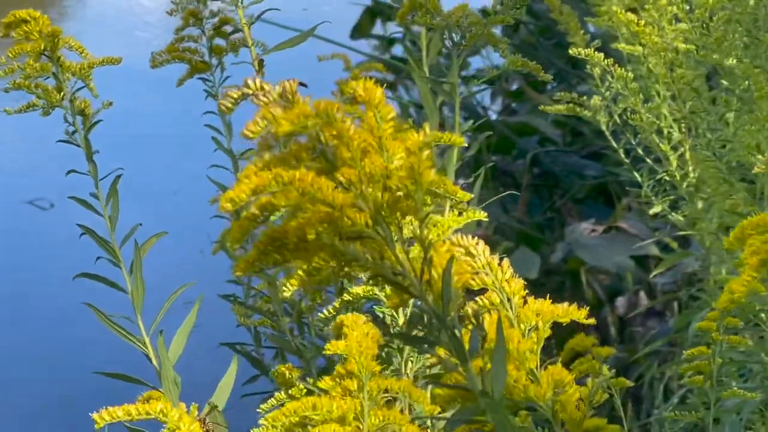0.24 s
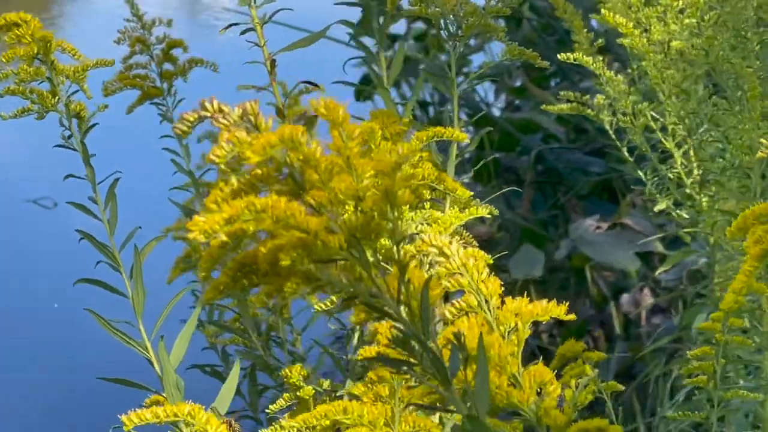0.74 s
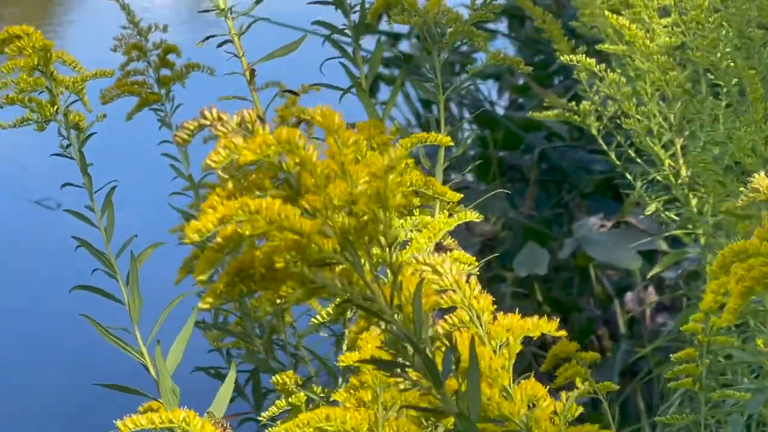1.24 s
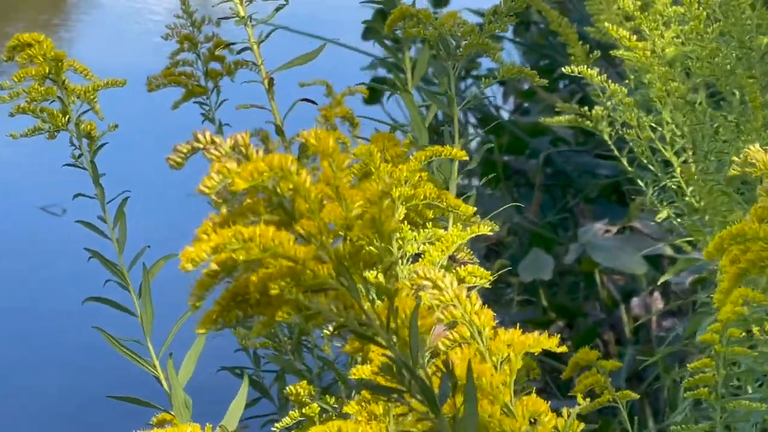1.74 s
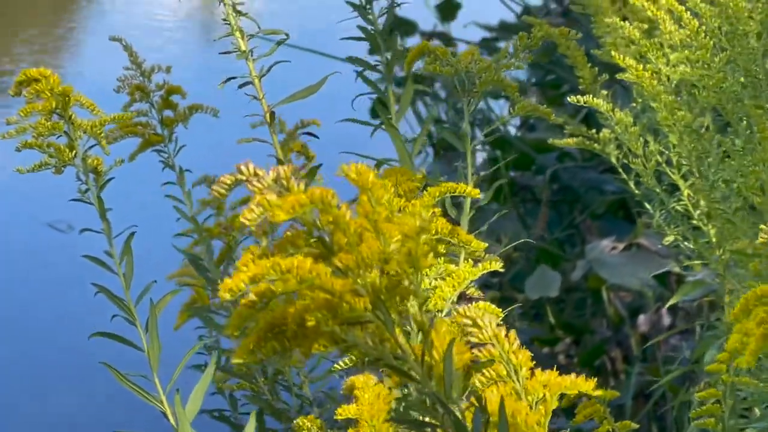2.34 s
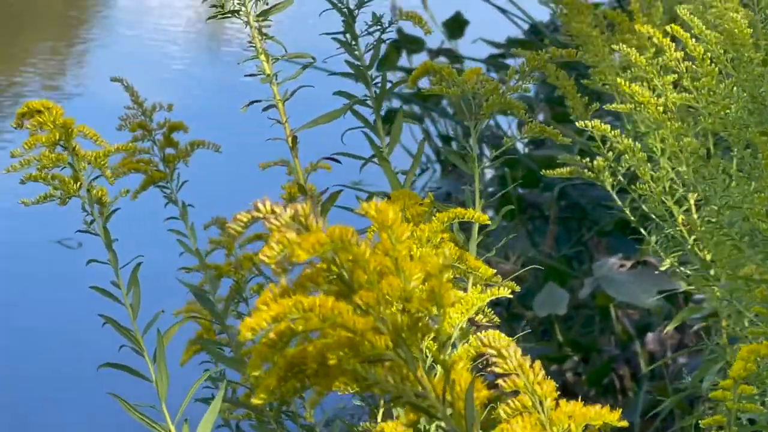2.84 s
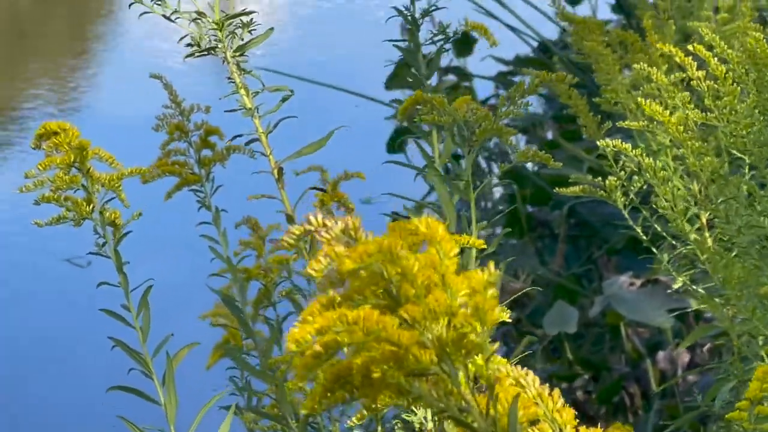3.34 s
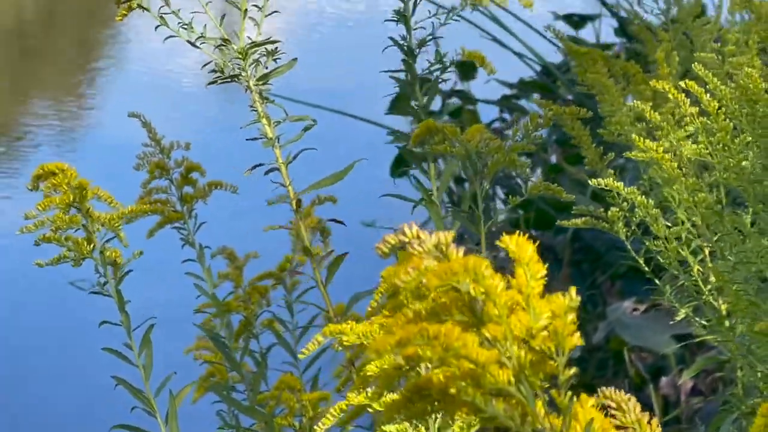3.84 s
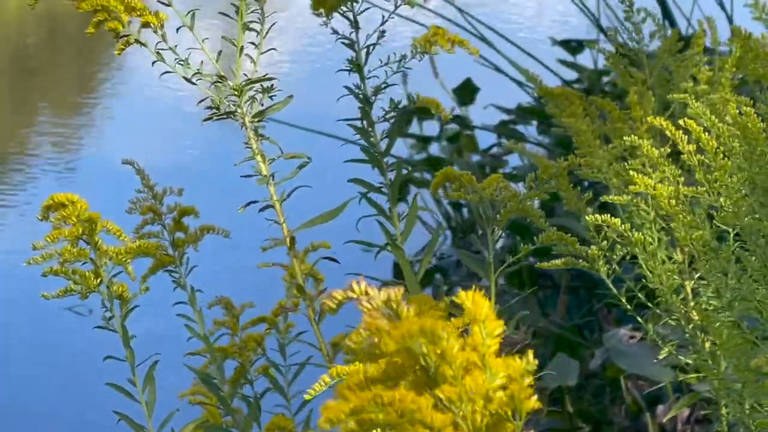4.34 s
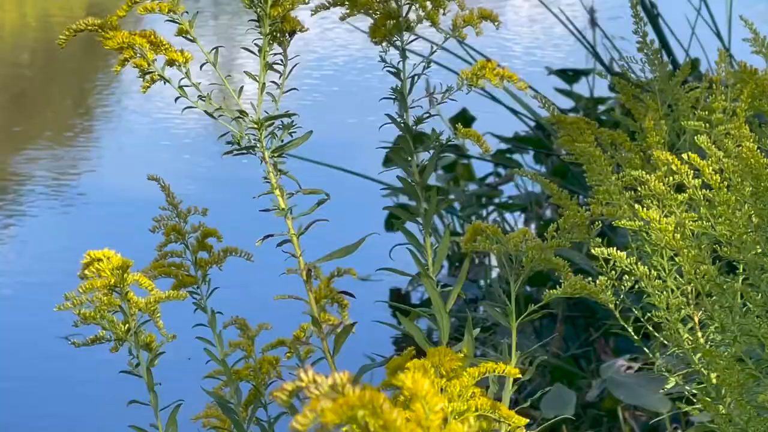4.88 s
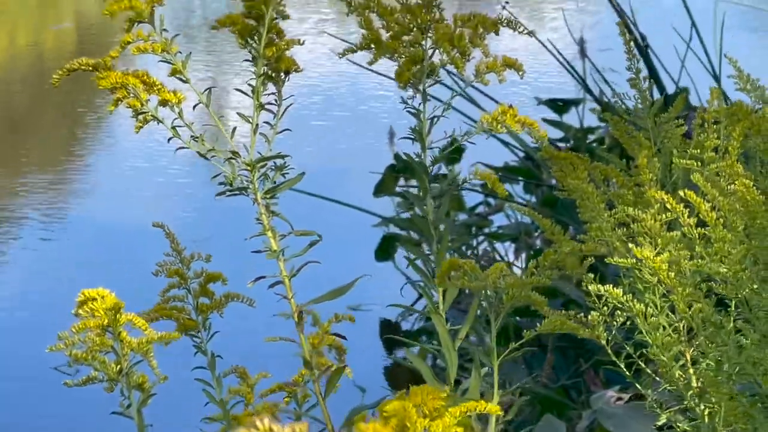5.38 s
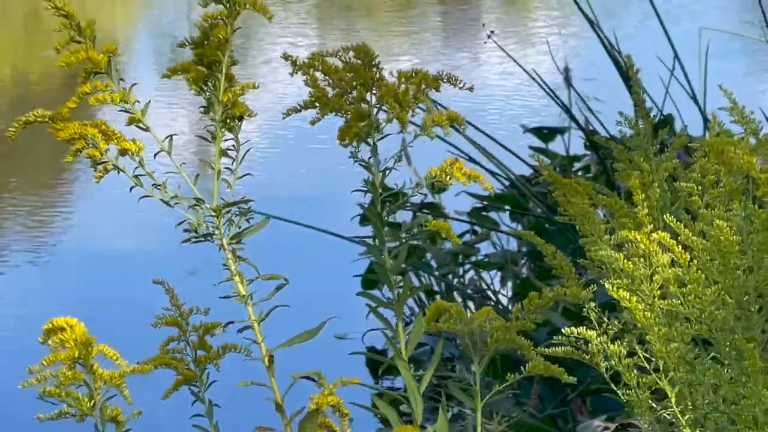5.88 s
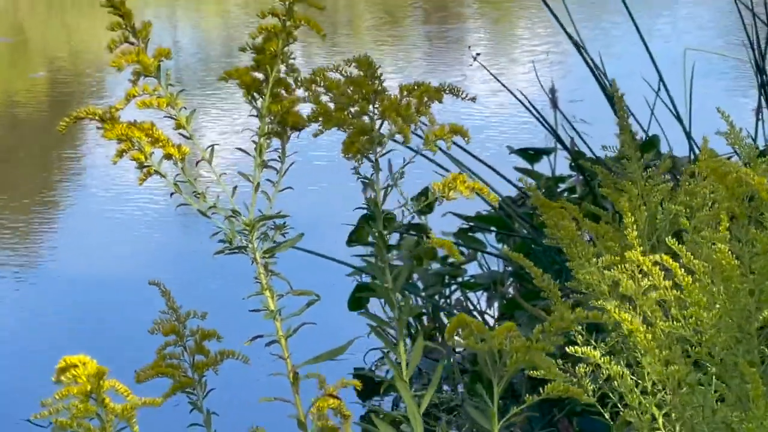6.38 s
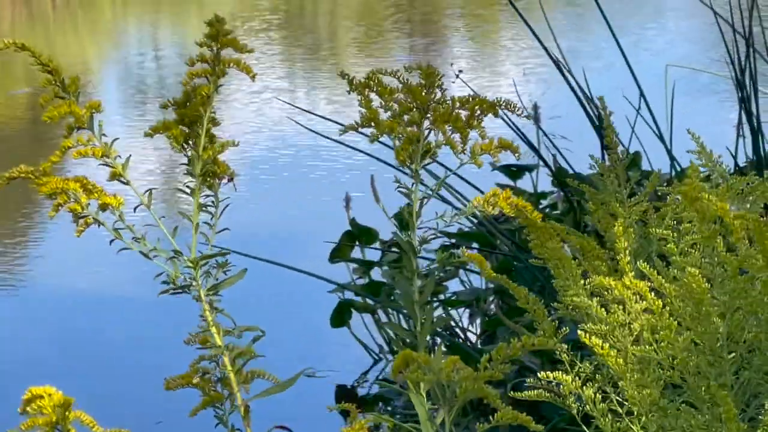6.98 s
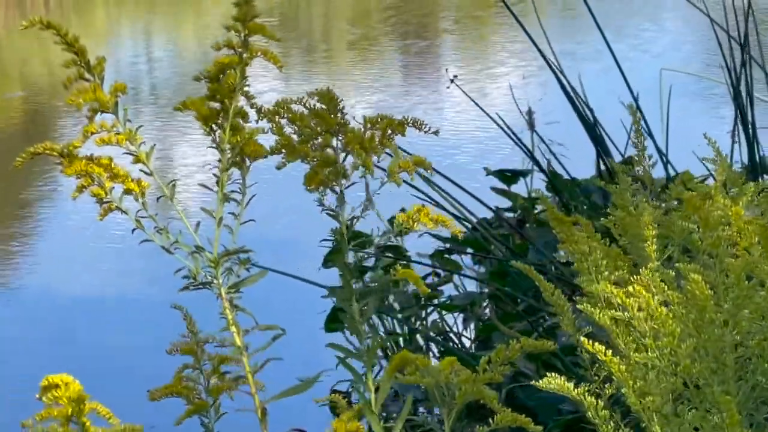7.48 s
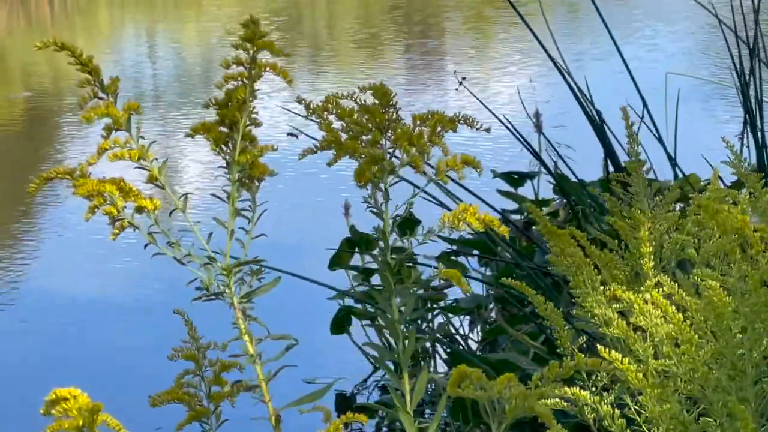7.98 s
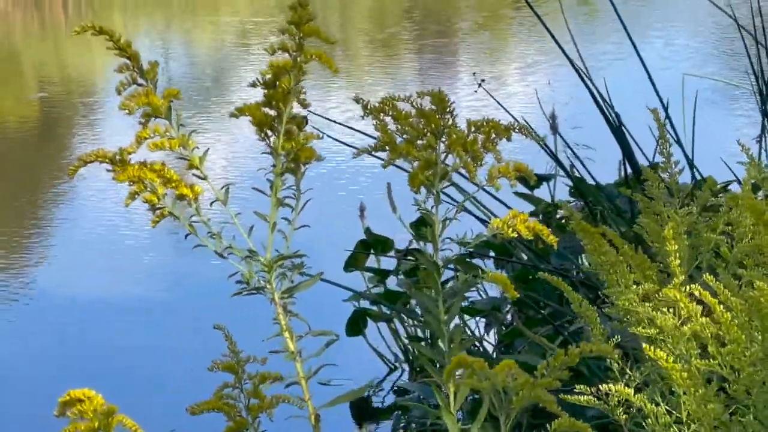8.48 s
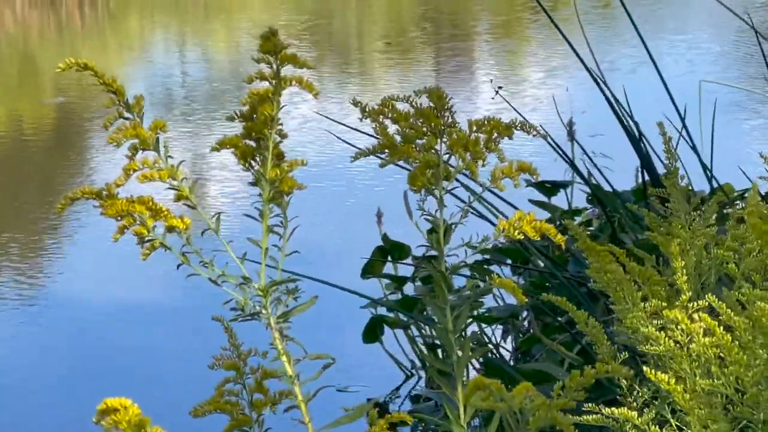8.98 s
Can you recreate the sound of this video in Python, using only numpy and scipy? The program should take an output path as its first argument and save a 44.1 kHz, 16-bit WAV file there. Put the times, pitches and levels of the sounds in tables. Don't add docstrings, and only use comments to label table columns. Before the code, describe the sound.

A bright, unbroken insect chorus of buzzing and pulsing trills outdoors, crossed by lumpy low wind buffeting and a distant whining motor early on.

```python
import sys
import numpy as np
from scipy import signal
from scipy.fft import rfft, irfft, next_fast_len
from scipy.io import wavfile
from scipy.ndimage import uniform_filter1d, map_coordinates

SR = 44100
rng = np.random.default_rng(int(sys.argv[2]) if len(sys.argv) > 2 else 0)


def to_wav(s):
    ch = np.atleast_2d(s).T
    pcm = np.round(np.clip(ch, -1, 1) * 32767)
    wavfile.write(sys.argv[1], SR, pcm.astype(np.int16))


def voltage_ratio(decibels):
    exponent = np.asarray(decibels, float) / 20
    return 10 ** exponent


N = 406602
LEFT_RIGHT = np.array([[1], [-1]])

# time in seconds, level in dB.
SONG = [(0, -61), (.9, -63.5), (1.67, -61), (3.3, -58.5), (4.3, -62), (5.06, -65), (5.85, -63.5), (7, -60),
        (9.22, -64)]


def unit(x):
    return x / np.sqrt(np.mean(x ** 2) + 1e-20)


def along(points, hz):
    f, v = np.transpose(points)
    return np.interp(np.log(hz + 1), np.log(f + 1), v)


def curves(rows):
    s, *cols = np.transpose(rows)
    return [np.interp(np.arange(N) / SR, s, c) for c in cols]


def wobble(rate):
    knots = rng.standard_normal(int(N * rate / SR) + 4)
    return map_coordinates(knots, [np.arange(N) * rate / SR])


def filtered(x, response):
    m = next_fast_len(N + SR // 2)
    return irfft(rfft(x, m) * response(np.fft.rfftfreq(m, 1 / SR)), m)[..., :N]


def rush(spectrum, alike, patchy_db):
    z = signal.stft(rng.standard_normal((2, N)), nperseg=512)[2]
    field = uniform_filter1d(rng.standard_normal(z.shape[1:]), size=6, axis=0)
    field = uniform_filter1d(field, size=10, axis=1)
    pair = signal.istft(z * voltage_ratio(patchy_db * unit(field)), nperseg=512)[1][:, :N]

    def mid_side(hz):
        turn = np.arccos(np.clip(along(alike, hz), -1, 1)) / 2
        return voltage_ratio(along(spectrum, hz)) * [np.cos(turn), np.sin(turn)]

    mid, side = filtered(pair, mid_side)
    return unit(np.array([mid + side, mid - side]))


def even(x, seconds):
    power = np.abs(uniform_filter1d(np.mean(x ** 2, axis=0), size=int(seconds * SR)))
    return unit(x / (power + .05) ** .35)


def ports(x, lead, wet_db):
    # frequency in Hz, time to fall 60 dB in seconds.
    weed_echo = [(3000, 0.24), (8000, 0.24)]
    hz, t, z = signal.stft(rng.standard_normal((2, SR // 6)), SR, nperseg=256)
    tail = signal.istft(z * voltage_ratio(-60 * t / along(weed_echo, hz)[:, None]), SR, nperseg=256)[1]
    wet = signal.fftconvolve(x[None], tail / np.linalg.norm(tail[0]), axes=1)[:, :N]
    direct = filtered(x, lambda hz: np.exp(.5j * lead * LEFT_RIGHT) + 0 * hz)
    return unit(direct + voltage_ratio(wet_db) * wet)


def counted(spells, start):
    s, rate = np.transpose(spells)
    spell = np.searchsorted(s, np.arange(N) / SR, side="right") - 1
    return start + np.cumsum(rate[spell]) / SR


def strokes(count, stroke, scatter_db, detune):
    whole = np.round(count)
    ms = 1000 * (count - whole) / (np.gradient(count) * SR)
    chance = rng.standard_normal((int(whole.max() - whole.min()) + 1, 3))
    chance = chance[(whole - whole.min()).astype(int)]
    at, hz, db = np.transpose(stroke)
    pitch = np.interp(ms, at, hz) * (1 + detune * chance[:, 0])
    phase = 2 * np.pi * (np.cumsum(pitch) / SR + .16 * chance[:, 2])
    return voltage_ratio(np.interp(ms, at, db, -90, -90) + scatter_db * chance[:, 1]) * np.sin(phase)


def katydid_crowd():
    # frequency in Hz, density in dB per Hz.
    apart_spectrum = [(3880, -55), (6600, -19), (6720, -17), (7290, 2.5), (8840, 7), (10900, 9.5),
                      (12800, -5), (13200, -40), (13400, -56), (14500, -77), (14700, -22), (15100, -43),
                      (16000, -31)]
    common_spectrum = [(8600, -50), (9450, -21), (10800, -12), (12600, -9), (13300, -6.5), (14000, -2),
                       (14650, 0), (15700, 1)]
    flicker = voltage_ratio([0.54 * wobble(90), 0.29 * wobble(90)])
    one, other = rush([(1, 0)], [(1, 0.016)], patchy_db=1.8) * flicker
    common = unit(filtered(one, lambda hz: voltage_ratio(along(common_spectrum, hz))))
    mixed = 0.69 * one + 0.61 * other
    apart = unit(filtered(mixed, lambda hz: 1j * voltage_ratio(along(apart_spectrum, hz))))
    return common + LEFT_RIGHT * voltage_ratio(-14.5) * apart


def near_katydid():
    # start in seconds, strokes a second.
    buzz_spells = [
        (0, 44.04),
        (1.38, 43.57),
        (3.22, 42.46),
        (4.6, 43.78),
        (5.52, 42.88),
        (7.36, 42.17),
        (7.82, 40.04),
        (8.28, 37.7),
    ]
    # frequency in Hz, density in dB per Hz.
    rasp_spectrum = [(7500, -31), (9000, -9.5), (12600, -13.5), (13800, 3), (14700, 2), (15800, 0),
                     (16300, -35)]
    gate_db = 3.6 * np.cos(2 * np.pi * counted(buzz_spells, start=-.14)) + .5 * wobble(20)
    rasp = unit(voltage_ratio(gate_db) * rush(rasp_spectrum, [(1, 1.0)], patchy_db=2.0)[0])

    def lag(hz):
        phase = np.interp(hz, [6000, 9000, 13000], [-1.2, -np.pi, -2 * np.pi])
        return np.exp(.5j * phase * LEFT_RIGHT)

    return filtered(rasp, lag)


def katydids():
    # time in seconds, level in dB.
    buzz_level = [(0, -42.5), (.7, -42), (1.3, -43.5), (2.3, -44), (2.6, -42.5), (3.8, -45), (4.7, -43),
                  (5.05, -40.5), (6.1, -41.5), (7.3, -42.5), (8.15, -42.5), (8.3, -43), (9.22, -42.5)]
    # time in seconds, share from 0 to 1.
    near_share = [(0, 0.1), (4.2, 0.22), (4.8, 0.13), (5.05, 0.18), (8.1, 0.26), (8.3, 0.12), (9.22, 0.13)]
    level_db, share = curves(buzz_level)[0], np.clip(curves(near_share)[0], 0, 1)
    return voltage_ratio(level_db) * (np.sqrt(1 - share) * katydid_crowd() + np.sqrt(share) * near_katydid())


def faltering(count, depth_db, recover):
    weak_runs = [(18, 37, 19), (44, 64, 5), (69.4, 199, 5.63), (206, 227, 10), (264, 287, 23),
                 (292, 331, 5.55), (336, 432, 6), (464, 488, 7), (506, 527, 10.5)]
    whole = np.round(count)
    missed = np.concatenate([np.arange(first, last + .6, every) for first, last, every in weak_runs])
    missed = np.round(missed)
    since = whole - np.r_[-99, missed][np.searchsorted(missed, whole, side="right")]
    return voltage_ratio(-depth_db * np.exp(-since / recover))


def near_cricket():
    # start in seconds, strokes a second.
    trill_spells = [
        (0, 51.61),
        (.87, 65.02),
        (2, 64.1),
        (3.312, 51.77),
        (4.97, 64.78),
        (7.83, 50.96),
    ]
    # time from its middle in ms, pitch in Hz, level in dB.
    near_stroke = [(-5.5, 5500, -28), (-3.6, 5300, -6), (-1, 5200, 0), (1.8, 5110, -2), (3.6, 4860, -8),
                   (6, 4530, -10), (7.8, 4420, -32)]
    count = counted(trill_spells, start=-.3)
    trill = strokes(count, near_stroke, scatter_db=1, detune=.003)
    trill = trill * faltering(count, depth_db=9, recover=.9)
    return voltage_ratio(curves(SONG)[0]) * ports(trill, lead=.7, wet_db=-12)


def far_cricket():
    # time in seconds, strokes a second.
    far_rate = [(0, 60), (.55, 60), (.75, 72), (3, 71.5), (3.35, 60), (6.15, 59), (6.4, 72.5), (7.85, 71.5),
                (8.15, 59.5), (9.22, 59)]
    # time from its middle in ms, pitch in Hz, level in dB.
    far_stroke = [(-5, 5900, -25), (-3, 5760, -4), (0, 5640, 0), (2.5, 5480, -3), (5, 5200, -9),
                  (6.5, 5050, -28)]
    near_db = curves(SONG)[0]
    sink_db = 0.54 * np.arange(N) / SR
    level_db = -64 + 0.39 * (near_db - near_db.mean()) - sink_db
    trill = strokes(np.cumsum(curves(far_rate)[0]) / SR, far_stroke, scatter_db=1.2, detune=.005)
    return voltage_ratio(level_db) * ports(trill, lead=-1.3, wet_db=-8)


def ground_crickets():
    chirping = [
        (11.212, .21),
        (11.79, .29),
    ]
    # time in seconds, low singer in dB, high singer in dB.
    tinkle_levels = [(0, -64.5, -68.5), (2.5, -64.5, -65), (4, -66.5, -73.5), (6.5, -66, -68),
                     (9.22, -67, -71)]
    # time from its middle in ms, pitch in Hz, level in dB.
    low_chirp = [(-13, 6230, -30), (-9, 6200, -5), (0, 6160, 0), (6, 6100, -5), (10, 5980, -10),
                 (17, 5930, -12), (21, 5900, -35)]
    high_chirp = [(-15, 6390, -30), (-10, 6380, -4), (0, 6360, 0), (9, 6330, -4), (14, 6260, -9),
                  (18, 6220, -28)]
    low_db, high_db = curves(tinkle_levels)
    low_count, high_count = (start + rate * np.arange(N) / SR for rate, start in chirping)
    low = ports(strokes(low_count, low_chirp, scatter_db=2, detune=.004), lead=-1.2, wet_db=-4)
    high = ports(strokes(high_count, high_chirp, scatter_db=2, detune=.002), lead=-1, wet_db=-4)
    return voltage_ratio(low_db) * low + voltage_ratio(high_db) * high


def cricket_chorus():
    # frequency in Hz, density in dB per Hz.
    chorus_spectrum = [(4350, -16), (4650, -4.5), (5300, 0), (5800, -9), (6400, -1), (7200, -4),
                       (8200, -5.5), (8600, -71)]
    alike = [(5000, 0.74), (6600, 0.94), (8000, 0.97)]
    return voltage_ratio(-65.5 + .4 * wobble(3)) * rush(chorus_spectrum, alike, patchy_db=1.3)


def wind():
    # time in seconds, strength in dB, share of small eddies in dB.
    wind_strength = [(0, -57, -7.5), (.5, -51, -13), (.9, -52.5, -5), (1.26, -55.5, -4.5), (1.8, -54.5, -4),
                     (2.05, -46.5, -6), (2.25, -44, -3), (2.67, -40, -6), (2.83, -48.5, -5.5),
                     (3.2, -55.5, -7.5), (3.95, -56.5, -5.5), (4.7, -56.5, -2.5), (5.85, -48, -12.5),
                     (7.1, -50, -8.5), (7.95, -46, -17), (8.6, -35.5, -20.5), (8.7, -53.5, -6.5),
                     (9.22, -56, -5.5)]
    # start in seconds, peak in dB, brightness in dB.
    gust_blows = [(0.847, -38.5, -32), (1.182, -42.5, -10), (1.353, -34.5, -14), (1.541, -35.5, -31),
                  (1.623, -39.5, -25), (1.718, -35, -3), (1.888, -33.5, -23), (1.92, -33, -17),
                  (2.037, -39, -14), (2.082, -39, 3.5), (2.105, -34.5, 5), (2.18, -36, -20),
                  (2.208, -40.5, 0.5), (2.257, -30, -11), (2.332, -31.5, -7.5), (2.388, -34, -6),
                  (2.674, -47, -19), (2.514, -38, -3), (2.552, -37, 3), (2.856, -31, -2),
                  (2.888, -28.5, -10), (2.949, -43.5, -25), (3.059, -27, -8), (3.625, -44, -12),
                  (3.995, -44, 1.5), (4.311, -57, 7), (6.083, -49, -15), (8.14, -39, -27),
                  (8.389, -33, -20), (8.419, -34, -14)]
    # time of the peak in seconds, level in dB.
    slow_eddies = [(.92, -51), (1.18, -62), (1.37, -45), (1.72, -48), (1.93, -49), (2.135, -39.5),
                   (2.9, -38), (3.08, -44), (3.29, -47), (3.85, -50), (6.076, -35.5), (6.88, -59),
                   (7.74, -47), (8.16, -39), (8.35, -68), (8.59, -43)]
    # frequency in Hz, density in dB per Hz.
    rumble_spectrum = [(18, -52), (30, -9), (54, -1.5), (75, 2), (124, -7.5), (200, -25.5), (260, -54),
                       (440, -120)]
    flutter_spectrum = [(90, -13.5), (140, 1), (250, -3.5), (370, -12), (480, -40.5)]
    snap_spectrum = [(250, -26), (370, 3.5), (500, -0.5), (700, -17.5), (950, -58)]
    # frequency in Hz, gain in dB.
    port_response = [(20, -19), (45, -0.5), (850, 0.5), (1300, -48)]

    rumble_db, eddy_db = curves(wind_strength)
    flutter_db = rumble_db + eddy_db
    surge_s = 0.026
    surge = sum(voltage_ratio(db) * np.exp(-((np.arange(N) / SR - s) / surge_s) ** 2) for s, db in slow_eddies)

    snap, flap, thud = np.zeros((3, N + SR))
    t = np.arange(SR // 4) / SR

    def blow(peak_db, t60, rise_s):
        return voltage_ratio(peak_db - 60 * t / t60) * (1 - np.exp(-t / rise_s))

    for s, db, snap_db in gust_blows:
        at = slice(round(s * SR), round(s * SR) + len(t))
        snap[at] += blow(db + snap_db, 0.039, 0.0041)
        flap[at] += blow(db, 0.065, 0.006)
        thud[at] += blow(db - 2.5, 0.19, 0.009)

    low = voltage_ratio(rumble_db - 0.5 + 1.8 * wobble(22)) + voltage_ratio(-1.5) * thud[:N] + surge
    lumps = voltage_ratio(flutter_db - 4 + 2.8 * wobble(45))
    middle = lumps + voltage_ratio(4) * flap[:N]
    brightness = voltage_ratio(0.78 * (flutter_db + 47.0) - 10.5)
    high = lumps * brightness + voltage_ratio(6) * snap[:N]

    alike = [(200, 0.87)]
    air = low * even(rush(rumble_spectrum, [(60, 0.84)], patchy_db=3.0), 0.052)
    air = air + middle * even(rush(flutter_spectrum, alike, patchy_db=-0.3), 0.021)
    air = air + high * rush(snap_spectrum, alike, patchy_db=2.0)
    return filtered(air, lambda hz: voltage_ratio(along(port_response, hz)))


def machine():
    # time in seconds, level in dB.
    hiss_level = [(0, -64), (1.31, -66.5), (1.51, -63), (2.83, -64), (2.95, -62), (3.11, -67.5),
                  (3.77, -72.5), (4.6, -64)]
    # frequency in Hz, density in dB per Hz.
    hiss_spectrum = [(590, -4), (1000, -1.5), (1660, -4), (1800, -4.5), (1950, -4.5), (2770, -2),
                     (3570, -7.5), (4500, -9), (5850, -10), (9900, -120)]
    # time in seconds, pitch in Hz, level in dB.
    glide_path = [(.6, 3030, -86), (.72, 3000, -71), (.92, 2940, -70), (1.1, 2870, -75), (1.35, 2760, -75),
                  (1.8, 2780, -76), (2.3, 2700, -84), (3, 2850, -77)]
    # start in seconds, length in seconds, level in dB.
    load_spells = [
        (1.35, .42, -72),
        (1.77, 0.64, -72),
        (2.4, 0.72, -80),
        (3.927, .18, -69),
    ]

    hiss_db, = curves(hiss_level)
    hz, glide_db = curves(glide_path)
    t = np.arange(N) / SR
    hiss = voltage_ratio(hiss_db + 2.0) * rush(hiss_spectrum, [(1200, 0.77), (2400, 0.8)], patchy_db=1.0)

    load, edge_s = voltage_ratio(-81), 0.07
    for s, length, db in load_spells:
        load = load + voltage_ratio(db) * np.clip(np.minimum(t - s, s + length - t) / edge_s, 0, 1)
    whine_phase = 2 * np.pi * np.cumsum(1790 + 22 * wobble(40)) / SR
    whine = load * voltage_ratio(1.6 * wobble(30.08)) * np.sin(whine_phase)

    sounding = (t > glide_path[0][0]) & (t < glide_path[-1][0])
    glide_phase = 2 * np.pi * np.cumsum(hz + 8 * wobble(40)) / SR
    glide = sounding * voltage_ratio(glide_db + 2 + 1.5 * wobble(18)) * np.sin(glide_phase)
    fade = np.clip((4.6 - t) / 0.99, 0, 1)
    return fade * (hiss + whine + glide)


def drips():
    # start in seconds, peak in dB.
    drip_times = [
        (7.801, -55),
    ]
    x, t = np.zeros(N + SR), np.arange(SR // 20) / SR
    for s, db in drip_times:
        x[round(s * SR):][:len(t)] += voltage_ratio(db - 60 * t / 0.057) * rng.standard_normal(len(t))
    colour = [(1500, -30), (2300, 3), (3800, -2), (5000, -30)]
    return voltage_ratio(4) * filtered(x[:N], lambda hz: voltage_ratio(along(colour, hz)))


def country_hush():
    # frequency in Hz, density in dB per Hz.
    hush_spectrum = [(71, -21.5), (120, -7), (200, -20), (410, -15), (1100, -17), (2700, -38.5),
                     (3380, -40.5), (3930, -44), (4300, -41), (5590, -73), (9460, -120)]
    # frequency in Hz, left-right likeness from 0 to 1.
    hush_alike = [(200, 0.25), (700, 0.38), (1400, 0.4), (2000, 1), (2600, 0.9), (4300, 0.49)]
    return voltage_ratio(-62 + 0.1 * wobble(1.62)) * rush(hush_spectrum, hush_alike, patchy_db=0.73)


def scene():
    insects = katydids() + near_cricket() + far_cricket() + ground_crickets() + cricket_chorus()
    return insects + wind() + machine() + drips() + country_hush()


def band_limit(x):
    return signal.sosfilt(signal.butter(12, 16000, fs=SR, output="sos"), x)


def record(dry):
    mix = filtered(dry, lambda hz: hz < 15740)
    return band_limit(mix)


dry = scene()
out = record(dry)
to_wav(out)
```